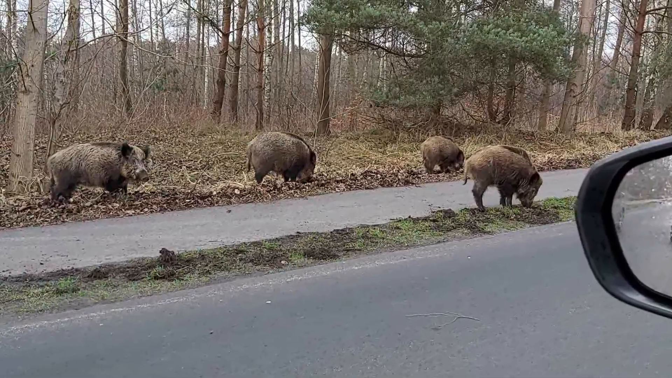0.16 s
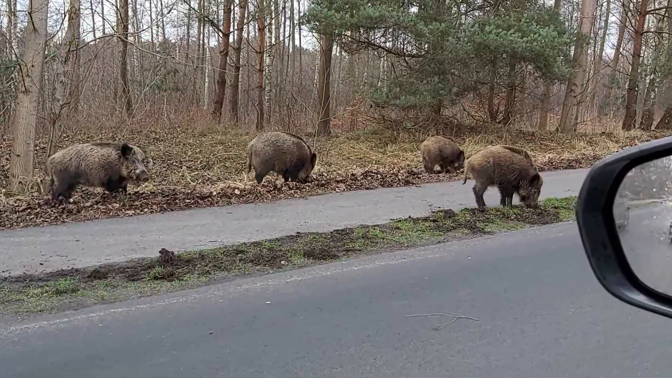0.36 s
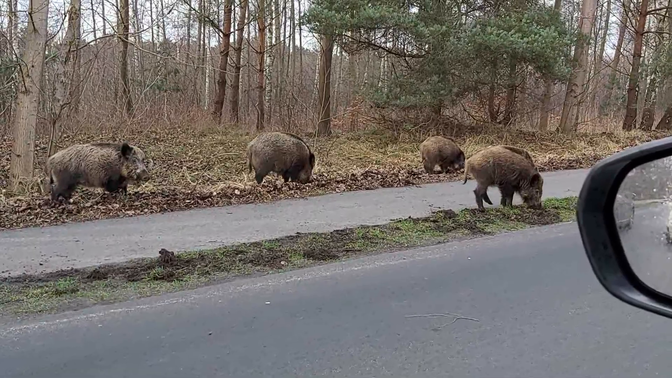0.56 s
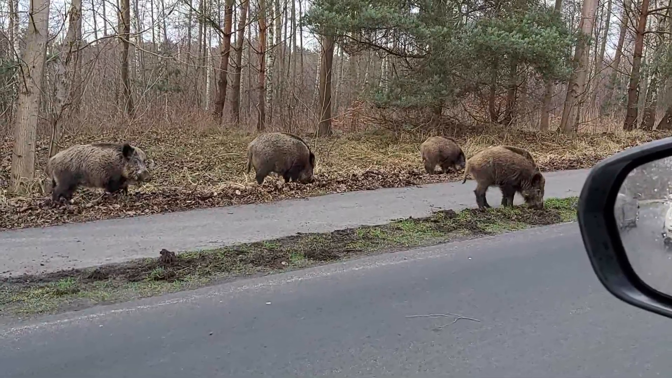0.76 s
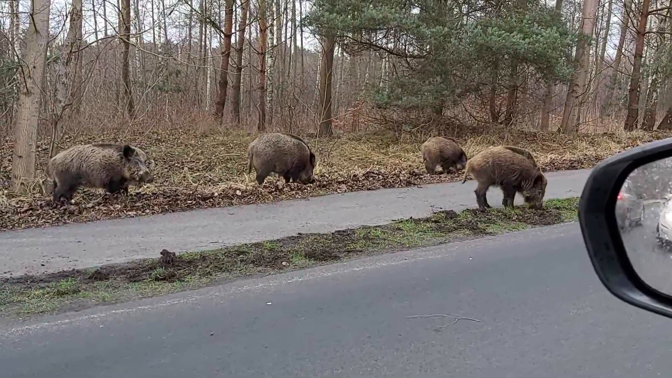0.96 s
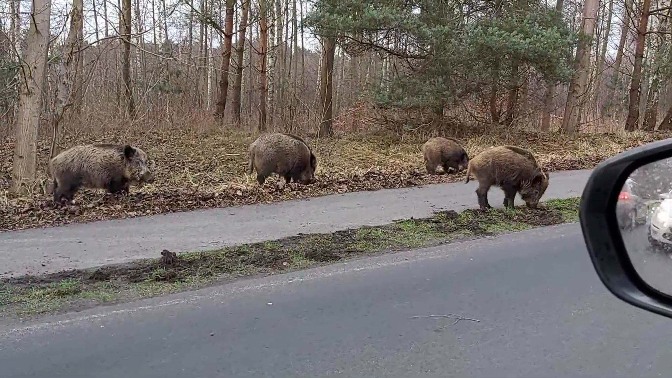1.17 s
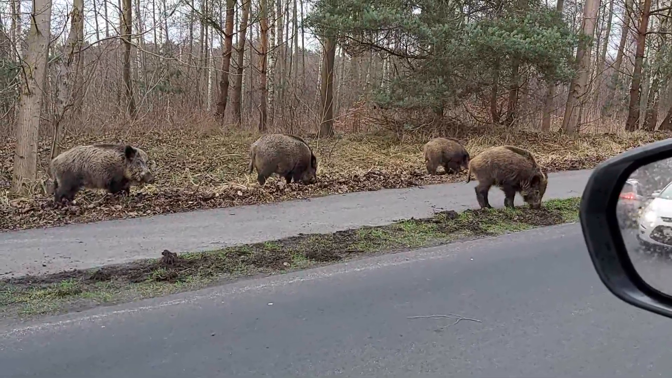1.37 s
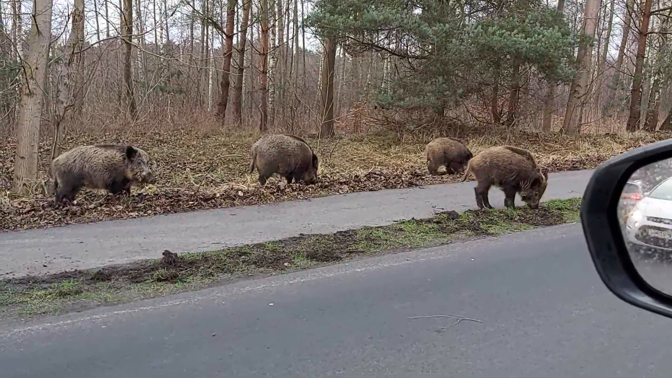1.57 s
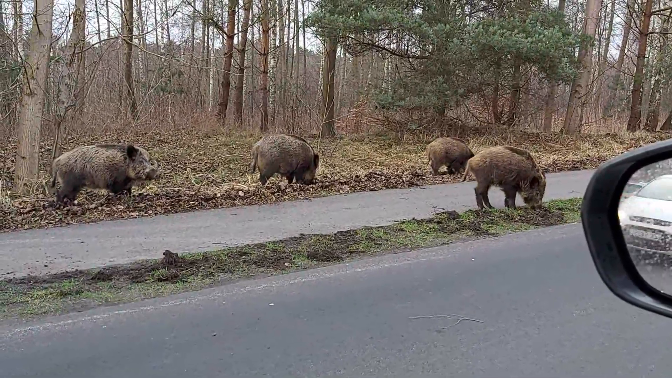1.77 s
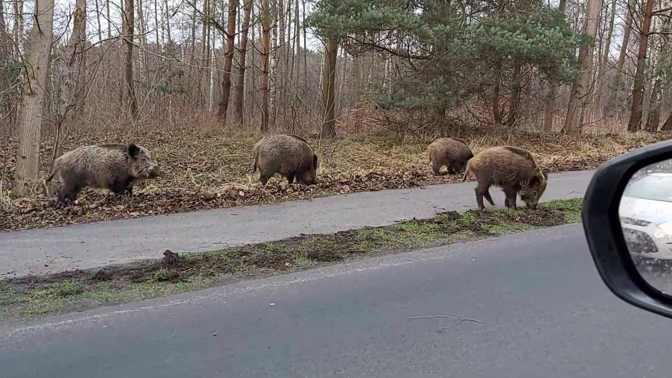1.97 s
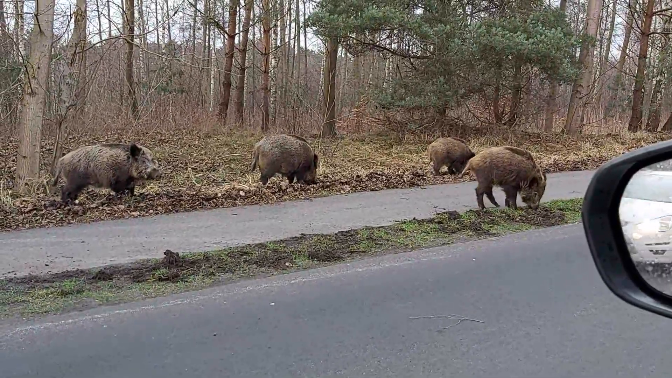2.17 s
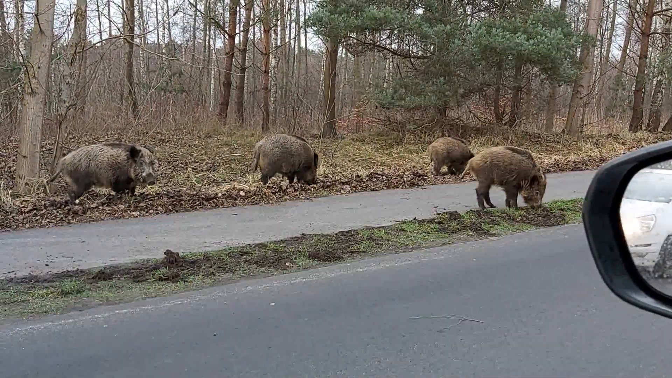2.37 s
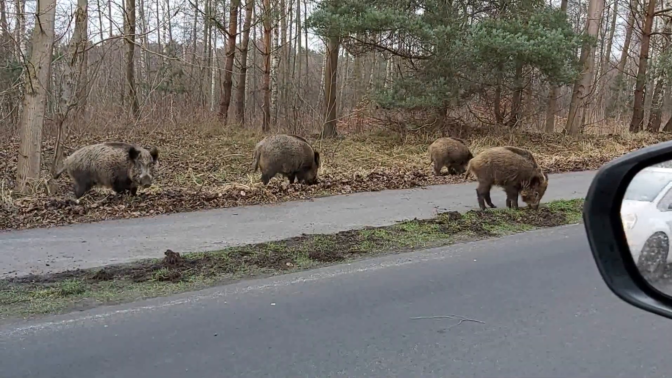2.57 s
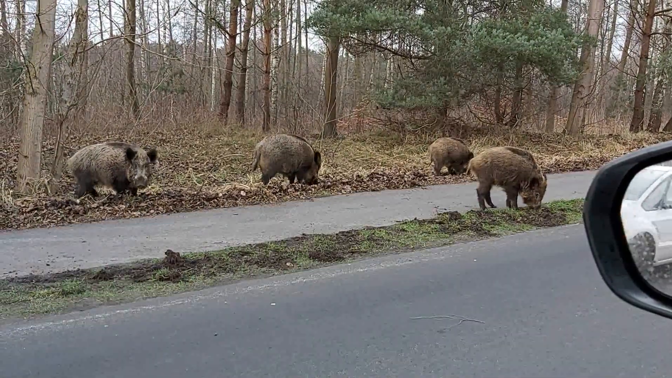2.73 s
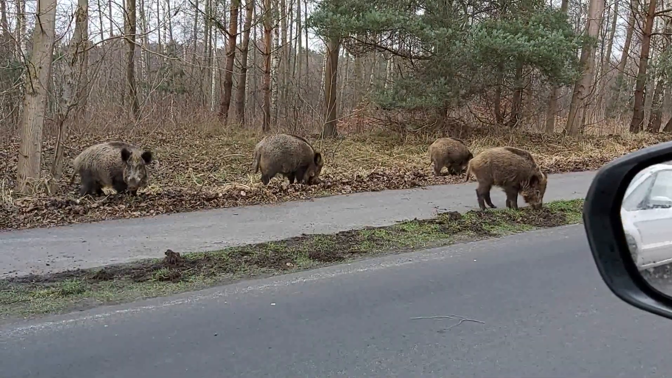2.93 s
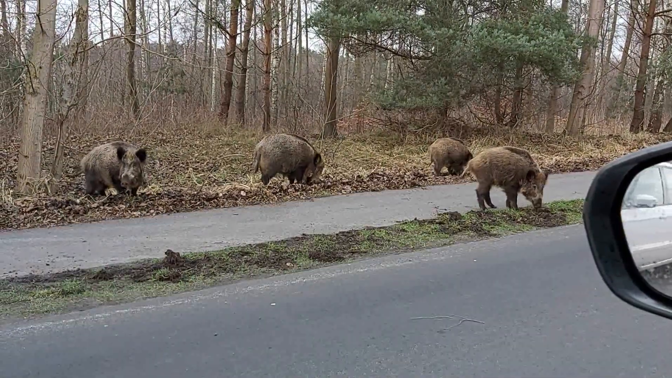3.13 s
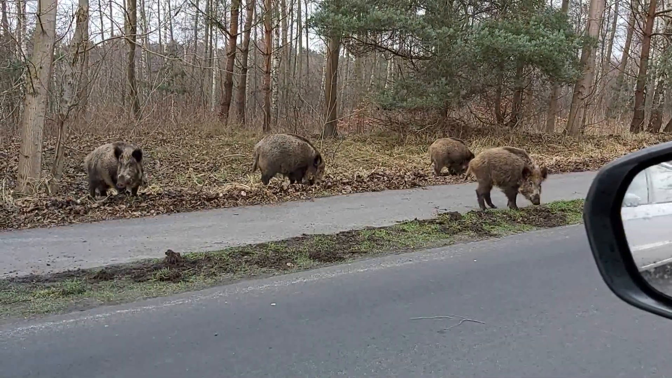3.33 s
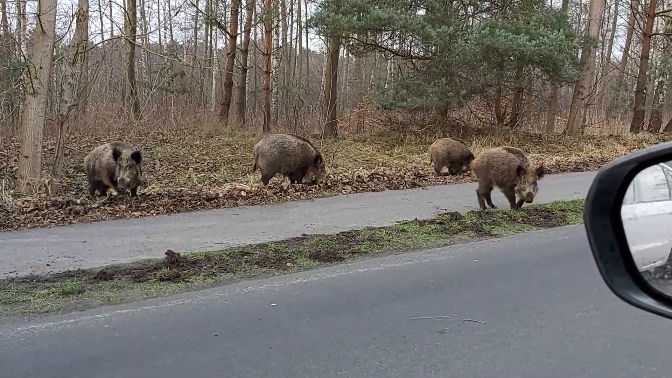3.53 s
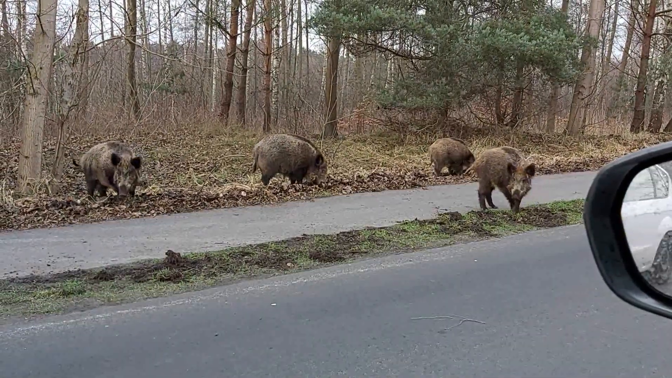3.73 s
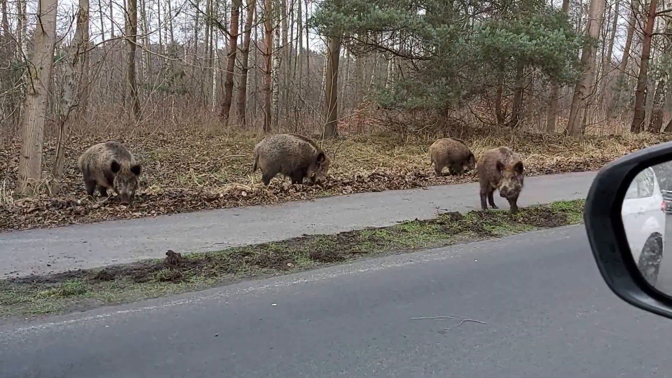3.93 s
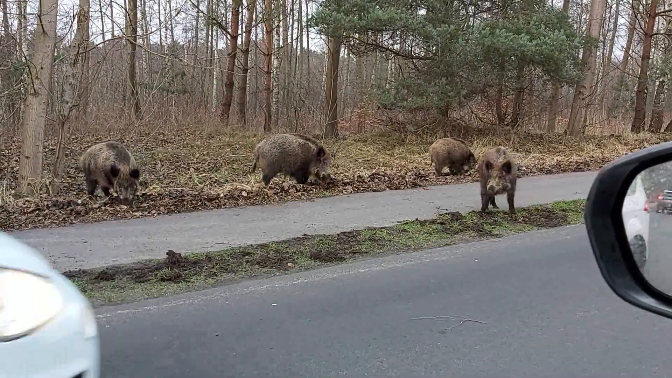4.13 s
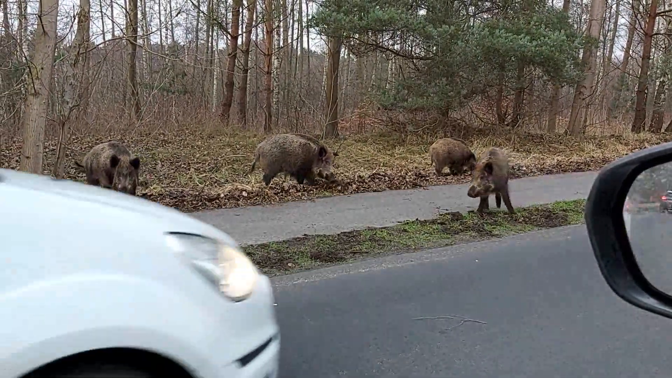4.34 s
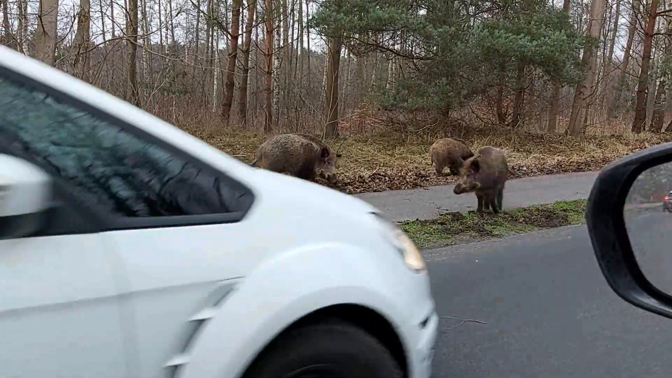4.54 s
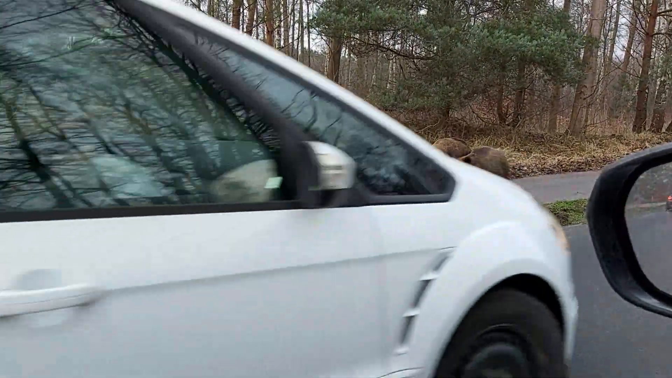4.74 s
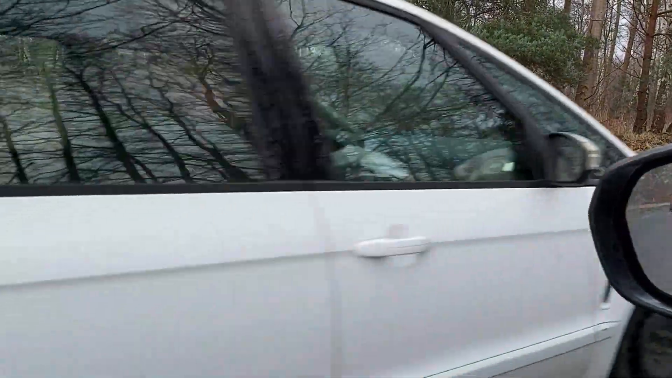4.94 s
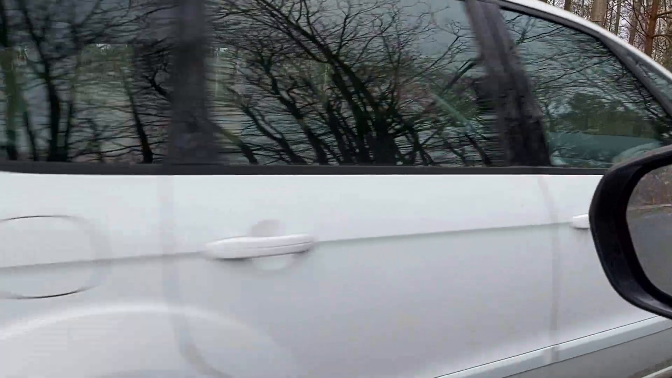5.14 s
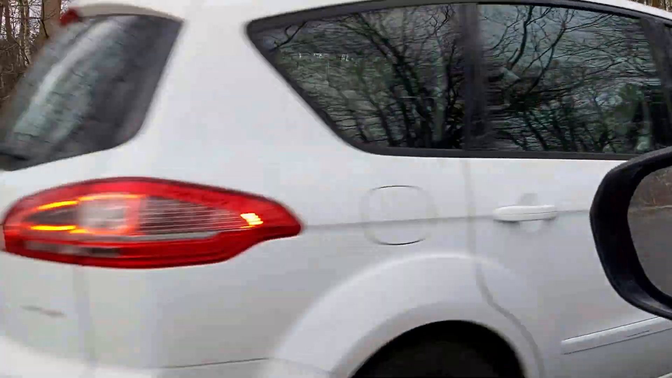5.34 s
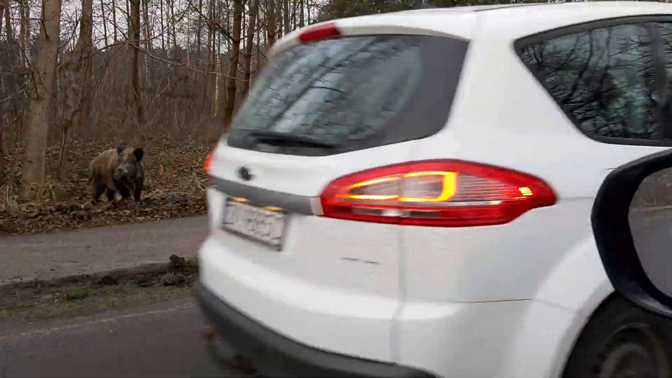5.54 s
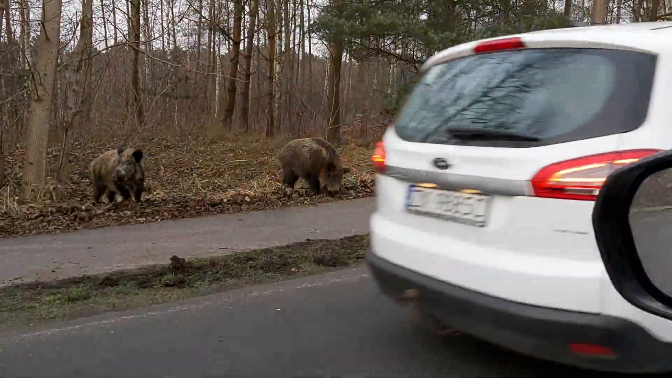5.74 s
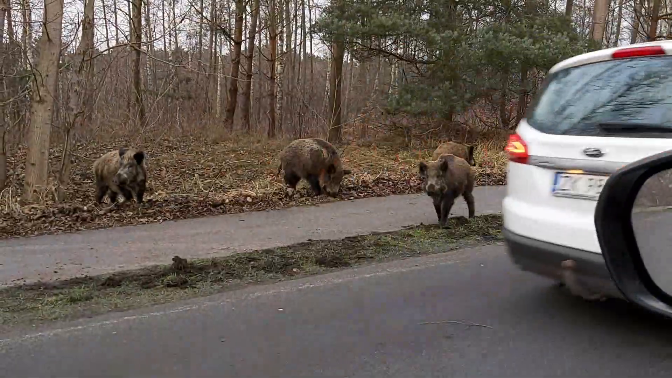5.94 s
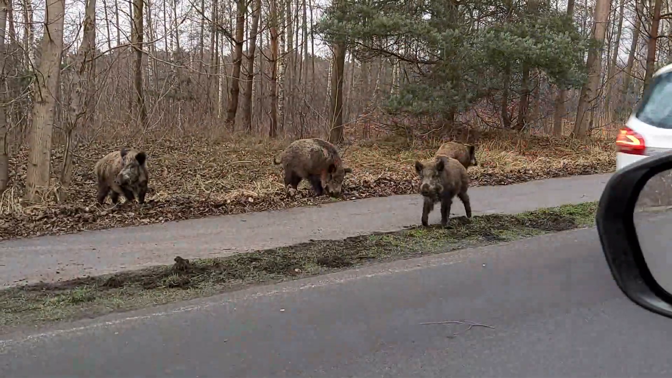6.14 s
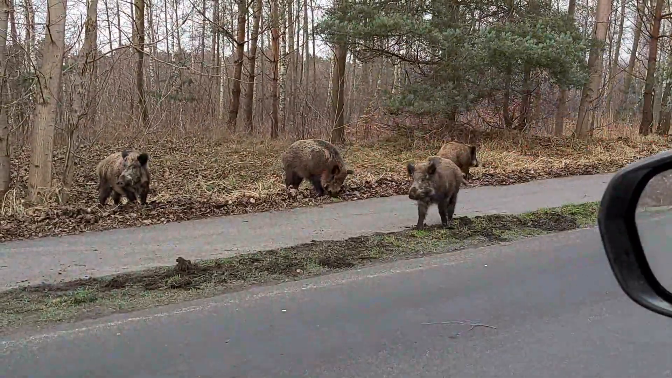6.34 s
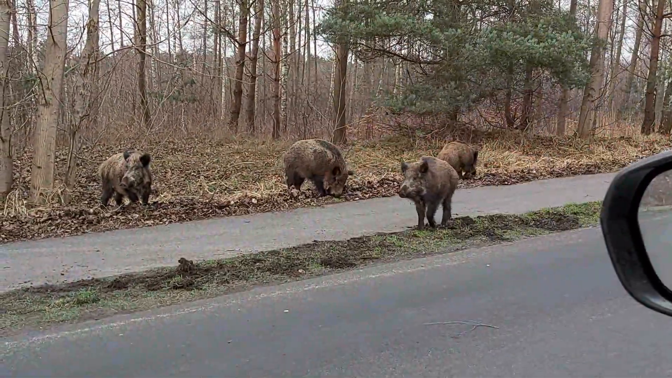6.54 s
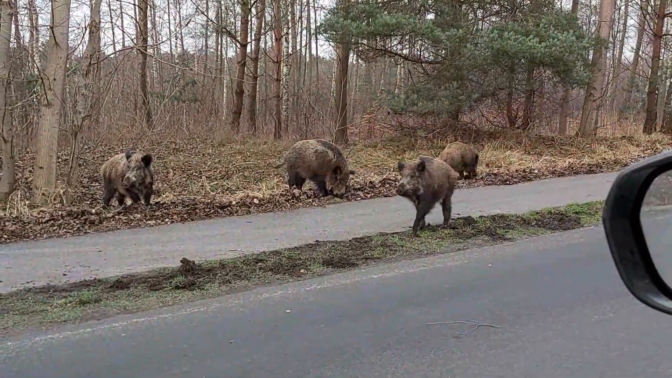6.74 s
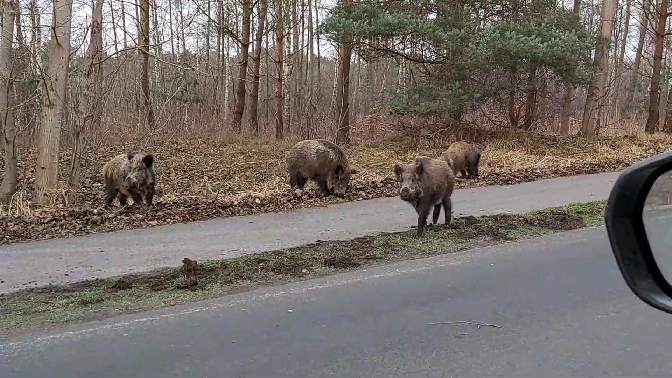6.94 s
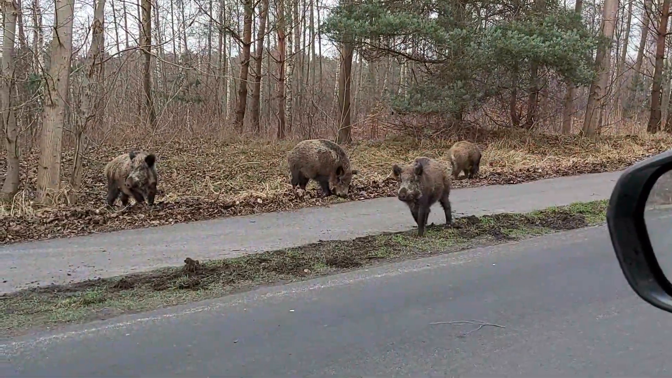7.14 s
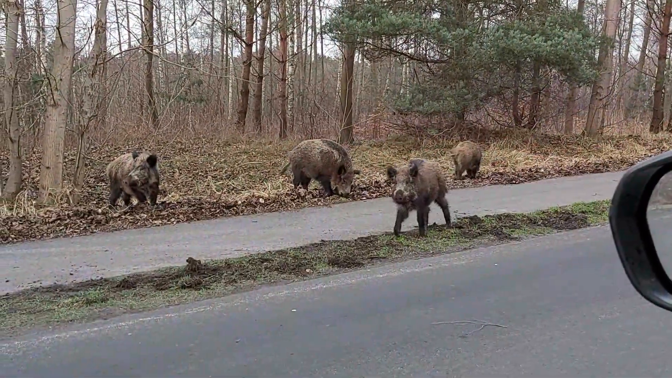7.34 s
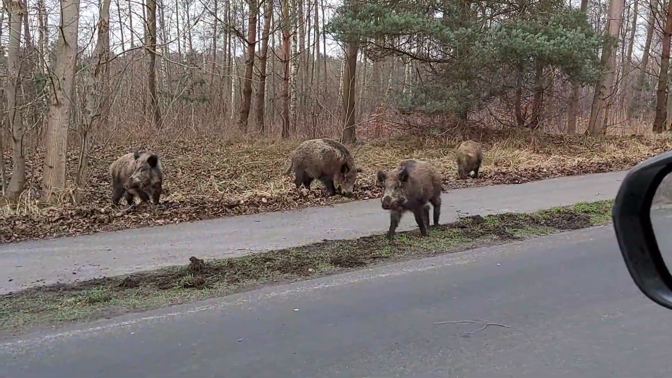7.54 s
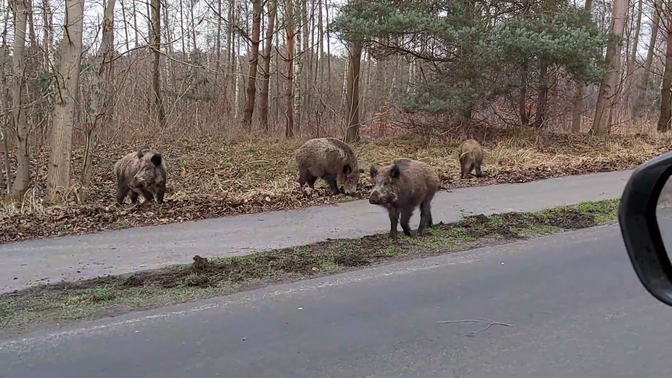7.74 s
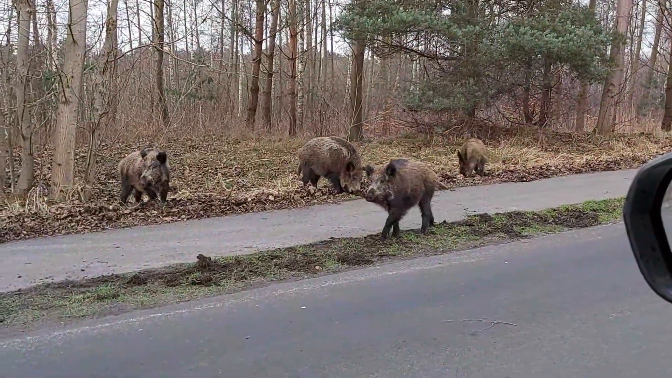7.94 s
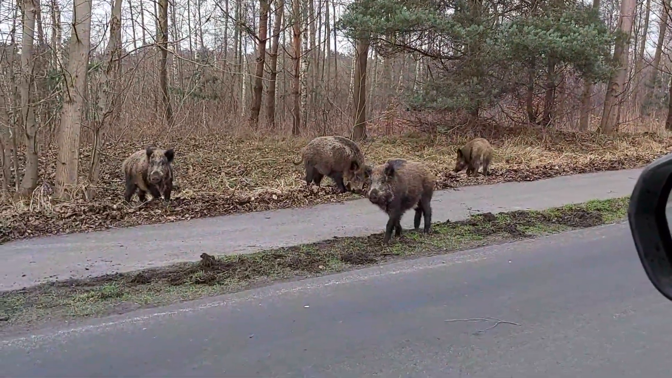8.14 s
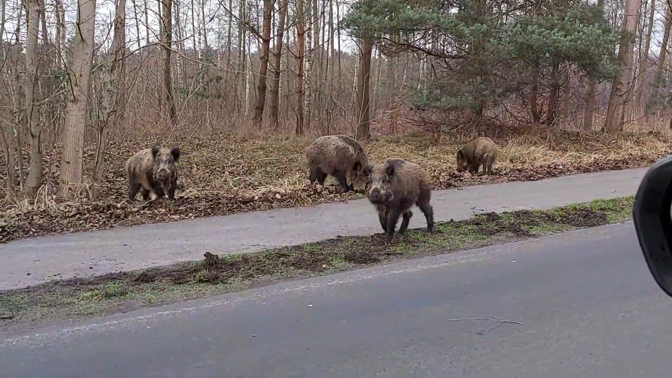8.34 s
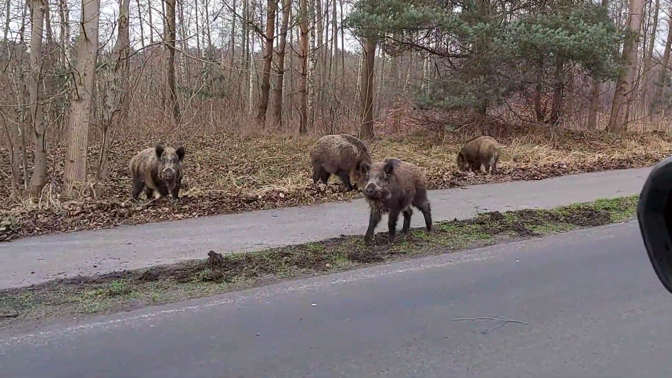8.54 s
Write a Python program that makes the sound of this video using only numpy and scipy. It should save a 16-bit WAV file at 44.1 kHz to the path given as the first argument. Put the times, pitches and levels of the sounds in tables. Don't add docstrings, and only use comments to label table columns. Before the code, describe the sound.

Heard from the open window of a car idling beside a forest road: a low, slightly wavering engine hum and airy wash. A diesel car creeps up from behind with dull rhythmic knocking, speeds up and passes very close with clatter, exhaust note and tyre roar, a tiny belt chirp on top, then recedes with a faint high turbo whistle, leaving the idle.

```python
import sys
import numpy as np
from scipy import signal
from scipy.fft import rfft, irfft, next_fast_len
from scipy.io import wavfile
from scipy.ndimage import uniform_filter1d

SR = 44100
rng = np.random.default_rng(int(sys.argv[2]) if len(sys.argv) > 2 else 0)


def generate_wav(sig):
    pcm = np.round(np.clip(np.atleast_2d(sig).T, -1, 1) * 32767).astype(np.int16)
    wavfile.write(sys.argv[1], SR, pcm)


def level_to_linear(level):
    exponent = np.asarray(level, float) / 20
    return 10 ** exponent


N = 383669


def read(points, hz):
    f, value = np.transpose(points)
    return np.interp(np.log(hz + 1), np.log(f + 1), value)


def play(rows, t):
    s, *columns = np.transpose(rows)
    return [np.interp(t, s, column) for column in columns]


def evened(x):
    return x / np.sqrt(np.mean(x ** 2) + 1e-20)


def drift(top_hz, t):
    rates_hz = np.geomspace(top_hz / 20, top_hz, 24)
    return evened(sum(np.sin(2 * np.pi * (f * t + rng.random())) / np.sqrt(f) for f in rates_hz))


def swell(t, peak_s, rise_s, fall_s, db):
    return level_to_linear(db) * np.exp(-.5 * ((t - peak_s) / np.where(t < peak_s, rise_s, fall_s)) ** 2)


def resonate(x, hz, width):
    turn = np.exp(2j * np.pi * np.cumsum(hz * np.ones(x.shape[-1])) / SR)
    r = np.exp(-np.pi * width / SR)
    return 2 * (turn * signal.lfilter([1 - r], [1, -r], x / turn)).real


def ring_noise(hz, width):
    return resonate(resonate(rng.standard_normal(N), hz, width), hz, width)


def rings(modes, hz):
    return sum(db / (1 + ((hz - f) / (w / 2)) ** 2) for f, w, db in modes)


# pitch in Hz, likeness from 0 to 1.
ALIKE = [(60, 0.65), (250, 1), (500, 0.8), (1000, 0.49), (2500, 0.4), (6000, 0.29), (12000, 0.32)]


def hiss(field_db, lead_ms, patchy_db, focus):
    hz = np.fft.rfftfreq(1024, 1 / SR)[:, None]
    t = np.arange(N // 256 + 5) * 256 / SR
    a, b, c, d, patches = rng.standard_normal((len(t), len(hz), 5)).T
    patches = uniform_filter1d(patches, size=10, axis=0)
    patches = evened(uniform_filter1d(patches, size=12, axis=1))
    same = np.clip(read(ALIKE, hz), 0, 1) ** (1 / focus)
    right = a + 1j * b
    early = np.exp(2j * np.pi * hz * lead_ms(t) / 1000)
    left = same * right * early + np.sqrt(1 - same ** 2) * (c + 1j * d)
    z = np.array([left, right]) * level_to_linear(field_db(hz, t) + patchy_db * patches)
    return signal.istft(z, nperseg=1024, noverlap=768)[1][:, :N] / 3


# time in seconds, firings per second in Hz.
SPEED = [(0.0, 36.0), (0.4, 37.2), (0.9, 42.0), (1.43, 36.3), (1.83, 33.19), (2.7, 34.1), (3.08, 37.03),
         (3.76, 39.55), (3.93, 44.65), (4.37, 45.8), (4.83, 54.51), (5.19, 56.71), (5.61, 62.31),
         (5.96, 57.69), (6.39, 56.02), (7.0, 55.43), (7.7, 54.8), (8.7, 54.4)]


def firings(t):
    return np.cumsum(uniform_filter1d(play(SPEED, t)[0], size=SR // 20)) / SR


# time in seconds, engine bay level in dB, tailpipe level in dB.
PASSING = [(0, -45.5, -57), (.5, -40.5, -44), (1.3, -42.5, -51), (1.8, -46, -62), (2.3, -44, -40),
           (2.7, -41, -40.5), (3.1, -34.5, -40), (3.5, -31, -37), (3.9, -28, -35.5), (4.15, -26, -27.5),
           (4.75, -24, -29), (5.2, -26, -26.5), (5.6, -30.5, -34.5), (6.1, -36.5, -36.5),
           (6.5, -42.5, -37.5), (7, -42.5, -39), (7.5, -46.5, -42), (8.7, -50, -47)]
# time in seconds, lead of the left port in ms, left minus right in dB,
# share of the rear in view from 0 to 1.
PLACE = [(0, 0.41, -3, 0.46), (3.8, 0.52, -2, 0.43), (4.4, .4, -2, 0.43), (4.8, 0.22, 0, 0.63),
         (5.4, 0.037, 0, 0.71), (6, -0.21, 0, 0.82), (6.6, -0.31, 2, 0.57), (8.7, -0.082, -5, 0.7)]
# pitch in Hz, width in Hz, group (0 middle, 1 low, 2 high; the
# fraction sets how little of the sharp blow it takes), level in dB.
BLOCK = [(1715, 870, 1.5, 6.5), (2444, 710, 2.4, 3), (3520, 480, 0, 8), (5060, 1540, 0.3, -3.5),
         (6110, 1060, 2.5, -4.5), (6820, 600, 2, -2.5), (11200, 2400, 2, -10)]
# peak time in seconds, rise in seconds, fall in seconds, level in dB.
KNOCK_VIEWS = [
    (3.1, 0.42, 0.36, 0),
    (3.95, 0.21, 0.13, -3),
    (5.248, 0.38, 0.2, -4),
]


def knocks(t_all):
    t = np.arange(2600) / SR
    shape = (1 - np.exp(-t / 0.0034)) * np.exp(-t / 0.0049)
    shape = shape + 0.47 * np.roll(shape, round(0.011 * SR)) + 0.14 * np.exp(-t / 0.15)
    snap = 3.8 * (np.arange(len(t)) == round(0.002 * SR))
    snap = snap + 3.1 * (np.arange(len(t)) == round(0.009 * SR))
    hz, width, group, ring_db = np.transpose(BLOCK)
    snap = snap * level_to_linear(-4.0 * group)[:, None]
    drives = np.zeros((len(BLOCK), 2, N + len(t)))
    cycles = firings(t_all) / 4 - 0.7036
    for s in np.interp(np.arange(int(cycles[-1])), cycles, t_all):
        burst = rng.standard_normal((3, len(t))) * shape
        seen = 1 + sum(swell(s, *view) for view in KNOCK_VIEWS)
        ports = (0.34 * burst[0] + 0.61 * burst[1:]) * seen
        lead_ms, _, rear = play(PLACE, s)
        knock_db = play(PASSING, s)[0] - 4 - 5.5 * rear ** 2 + 0.9 * rng.standard_normal()
        group_db = np.array([0, -1.5 - 0.5 * rear, -11 + 19 * rear])
        uneven_db = 2.2 * rng.standard_normal(len(BLOCK)) * (group > 0)
        strength_db = knock_db + ring_db + group_db[group.astype(int)] + uneven_db
        strength_db[:3] += rear * np.array([-4.0, 9.0, -14.0]) + np.array([0.1, -5.0, 3.5])
        for side, at in enumerate((round((s - lead_ms / 1000) * SR), round(s * SR))):
            drives[:, side, at:at + len(t)] += level_to_linear(strength_db)[:, None] * (ports[side] + seen * snap)
    return level_to_linear(13.5) * sum(resonate(resonate(d[:, :N], f, w), f, w) for d, f, w in zip(drives, hz, width))


# level over the engine bay in dB, dB added from behind.
ORDERS_FAR = [(-4.5, -3), (-3.5, 9), (-6, 3), (0.5, -15.5)]
# order, peak time in seconds, rise in seconds, fall in seconds, peak level in dB.
BEAMS = [(1, 4.55, 0.49, 0.37, -26.5), (1, 6, 0.19, 0.48, -36.5), (2, 3.79, .4, 0.12, -31),
         (2, 4.62, 0.45, 0.29, -26), (2, 5.35, .25, 0.56, -33.5), (3, 4.17, 0.29, 0.62, -32.5),
         (4, 0.73, 0.27, 0.44, -45.5), (4, 3.585, 0.34, 0.27, -30.5), (4, 4.4, 0.32, 0.49, -37.5)]


def engine_orders(t):
    turns = firings(t)
    rear = play(PLACE, t)[2]
    far_db = np.minimum(play(PASSING, t)[0], -43.5)
    lines = 0
    for order, (db, rear_db) in enumerate(ORDERS_FAR, start=1):
        gain = level_to_linear(far_db + db + rear_db * rear)
        gain = gain + sum(swell(t, *beam) for k, *beam in BEAMS if round(k) == order)
        gain = gain * level_to_linear(0.79 * drift(6.5, t))
        lines = lines + gain * np.sqrt(2) * np.cos(2 * np.pi * (order * turns + rng.random()))
    return lines


# pitch in Hz, width in Hz, level in dB.
PIPE = [(376, 107, -4.5), (552, 82, 0), (664, 70, -4.5)]


def body(x, modes):
    return sum((-1) ** k * level_to_linear(db) * resonate(resonate(x, hz, w), hz, w)
               for k, (hz, w, db) in enumerate(modes))


def tailpipe(t):
    shaky = firings(t) + 0.019 * drift(30, t)
    pulses = 0
    for k in range(10, 40):
        gain = level_to_linear(3.7 * drift(6, t[::256]))[np.arange(N) // 256]
        pulses = pulses + (1 - .5 * (k % 2)) * gain * np.cos(np.pi * k * shaky + k * k * .2)
    near = swell(t, peak_s=5.5, rise_s=0.68, fall_s=0.46, db=-36)
    far = level_to_linear(-17 + play(PASSING, t)[1])
    return (near + far) * evened(body(pulses, PIPE))


# pitch in Hz, level in dB per Hz.
FRONT = [(59, -34), (100, -15), (156, -24), (189, -12), (372, -5.5), (867, -18.5), (1600, -28), (2300, -33),
         (3580, -29.5), (4620, -26), (15800, -30)]
REAR = [(59, -25), (100, 21), (124, -4), (214, -17), (479, -25.5), (556, -19.5), (1190, -29.5), (2720, -22),
        (3220, -34), (7360, -35), (15800, -32)]
# pitch in Hz, width in Hz, level in dB.
FRONT_RINGS = [(1393, 50, 19), (1440, 89, -8.5), (1846, 76, 10), (2460, 280, 5.5), (3540, 590, 17.5),
               (4230, 290, 12), (6080, 1400, 12.5), (15800, 1300, 8)]
REAR_RINGS = [(580, 50, 0.5), (930, 510, 8.5), (1531.4, 92, 13), (2560, 320, -5.5), (7250, 380, 4.5),
              (10700, 2800, 9.5), (15900, 2300, -9)]
PARTS_HZ = [454, 1110, 2200, 9300]
# level in dB, share of the bay level, bay level in dB where it stops
# growing, share of the tailpipe level, dB added from behind.
PARTS = [
    (38.5, 1.624, -38.5, .01, -19),
    (0, 0.009, -15, 0.9, 2),
    (3.5, 0.7, -15, 0.34, -9),
    (0.62, 1.054, -15, 0.017, 5),
    (0, 1.23, -15, .01, 6),
]


def diesel_noise(hz, s):
    above = [1 / (1 + (edge_hz / (hz + 1)) ** 12) for edge_hz in [110] + list(PARTS_HZ)] + [0]
    rear = np.clip(play(PLACE, s)[2], 0, 1)
    front_db = read(FRONT, hz) + rings(FRONT_RINGS, hz)
    rear_side_db = read(REAR, hz) + rings(REAR_RINGS, hz)
    colour = level_to_linear((1 - rear) * front_db + rear * rear_side_db) ** 2
    bay_db, tail_db = play(PASSING, s)
    power = 0
    for low, high, (db, bay, top_db, tail, rear_db) in zip(above, above[1:], PARTS):
        part = (low - high) * colour
        part_db = db + bay * np.minimum(bay_db, top_db) + tail * tail_db + rear_db * rear ** 5.9
        power = power + part / part.sum(0) * level_to_linear(part_db) ** 2
    return 10 * np.log10(power + 1e-20)


def throb(turns, sharp):
    return evened(np.exp(-(turns % 1) * sharp))


def diesel(t):
    lead_ms, pan_db, _ = play(PLACE, t)
    tone = engine_orders(t) + tailpipe(t)
    tones = np.array([np.interp(t + lead_ms / 1000, t, tone), tone])
    roar = hiss(diesel_noise, lambda s: play(PLACE, s)[0], patchy_db=1.23, focus=0.66)
    bright = signal.sosfilt(signal.butter(2, 1300, "high", fs=SR, output="sos"), roar)
    roar = roar + 0.2 * bright * (throb(firings(t), sharp=1.8) - 1)
    return (tones + level_to_linear(1.0) * roar) * level_to_linear(np.array([pan_db, -pan_db]) / 2)


# pitch in Hz, width in Hz, peak time in seconds, spread in seconds, level in dB.
PANELS = [(1380, 94, 0.17, 0.97, -48), (1784, 210, 0.61, 0.76, -52), (1570, 170, 3.6, 0.22, -42.5),
          (1836, 76, 3.53, 0.24, -45.5), (1040, 280, 4.5, 0.53, -35.5), (1560, 140, 4.6, 0.21, -46),
          (2660, 350, 4.5, 0.16, -49)]


def panels(t):
    rung = 0
    for hz, width, s, spread, db in PANELS:
        rung = rung + swell(t, s, spread, spread, db) * evened(ring_noise(hz, width))
    lead = np.round(play(PLACE, t)[0] / 1000 * SR).astype(int)
    early = np.clip(np.arange(N) + lead, 0, N - 1)
    return np.array([rung[early], rung])


def whistle(hz, gain, width):
    fuzz = ring_noise(hz, width)
    fuzz = fuzz / np.sqrt(uniform_filter1d(evened(fuzz) ** 2, size=800) + 0.37)
    return gain * evened(fuzz) * level_to_linear([[3], [-5]])


# peak time in seconds, rise in seconds, fall in seconds, level in dB.
BELT = [
    (4.41, .06, .03, -47),
    (4.59, .04, 0.039, -41.5),
    (4.74, 0.045, 0.034, -56.5),
    (7.2, 0.27, .3, -69),
]


def belt(t):
    return whistle(6130, sum(swell(t, *row) for row in BELT), width=220)


# time in seconds, pitch in Hz, level in dB.
TURBO = [(5.0, 9650, -100), (5.3, 9900, -76), (5.6, 10300, -64), (5.95, 11050, -64), (6.25, 11300, -68),
         (6.55, 11250, -73), (6.8, 10950, -84), (7.02, 10870, -71), (7.6, 10700, -90)]


def turbo(t):
    hz, db = play(TURBO, t)
    return whistle(hz, level_to_linear(db), width=170)


# time in seconds, effort in dB.
IDLE = [(0, 1), (.5, 1), (1.6, -3.5), (2.8, 1.5), (3.5, -2.5), (4.6, 2.5), (6.2, -4), (6.7, 3.5),
        (7.5, 2.5), (8.0, 0), (8.7, -1.5)]
# order, level in dB, share of the effort it follows.
IDLE_MAIN = [(2, -36, 1.0), (3, -43, 0.17), (4, -42.5, 0.61)]
# order, level in dB.
IDLE_REST = [(1, -52), (5, -49.5), (6, -50.5), (7, -51.5), (8, -56.5), (9, -53), (10, -49.5)]
# pitch in Hz, level in dB per Hz.
WASH = [(15, -29), (25, 2), (49, 1.5), (84, -4), (174, -6.5), (261, -8.5), (413, -17), (587, -14.5),
        (1010, -22.5), (1640, -28.5), (3130, -38), (7610, -40.5), (9450, -47.5), (14200, -55), (15800, -88)]
# pitch in Hz, width in Hz, level in dB.
WASH_RINGS = [(325, 55, 3.4), (560, 37, 2.9), (1490, 46, 0.92), (1850, 650, 3.9), (2480, 210, 5),
              (6100, 210, 0.5)]


def parked(t):
    turns = 26.86 * t + 0.013 * drift(2.2, t)
    effort_db = play(IDLE, t)[0]
    orders = [(k, db + share * effort_db) for k, db, share in IDLE_MAIN] + list(IDLE_REST)
    hum = 0
    for k, db in orders:
        gain = level_to_linear(db + 1.2 * drift(3.9, t))
        hum = hum + gain * np.sqrt(2) * np.cos(2 * np.pi * (k * turns + rng.random()))
    wash = evened(hiss(lambda f, s: read(WASH, f) + rings(WASH_RINGS, f) + 0 * s,
                       lambda s: .5 + 0 * s, patchy_db=1.34, focus=0.67))
    wash = signal.sosfilt(signal.butter(4, 52, "high", fs=SR, output="sos"), wash)
    wash *= 1 + .06 * np.cos(2 * np.pi * turns)
    return hum * level_to_linear([[-1.5], [1.5]]) + level_to_linear(-34) * wash * level_to_linear([[-.6], [.6]])


def scene():
    t = np.arange(N) / SR
    return knocks(t) + diesel(t) + panels(t) + belt(t) + turbo(t) + parked(t)


def roll_off(x):
    return signal.sosfilt(signal.butter(12, 15790, fs=SR, output="sos"), x)


# pitch in Hz, width in Hz, level in dB.
LEFT_PORT = [(7590, 1000, 8), (9600, 2050, -7), (11300, 2600, 0.5)]
RIGHT_PORT = [(780, 370, 1), (1593, 340, 5.5), (2270, 290, -5), (12200, 6030, -16.5)]


def record(dry):
    size = next_fast_len(N)
    hz = np.fft.rfftfreq(size, 1 / SR)
    colour_db = np.array([rings(LEFT_PORT, hz), rings(RIGHT_PORT, hz)])
    mix = irfft(rfft(dry, size) * level_to_linear(colour_db), size)[:, :N]
    return roll_off(mix)


dry = scene()
out = record(dry)
generate_wav(out)
```